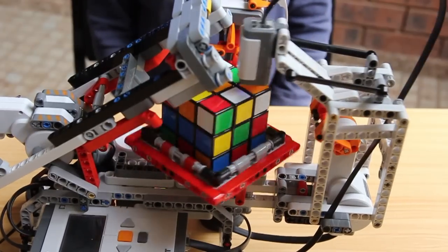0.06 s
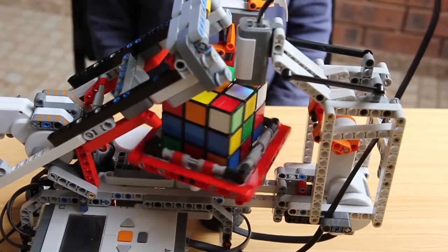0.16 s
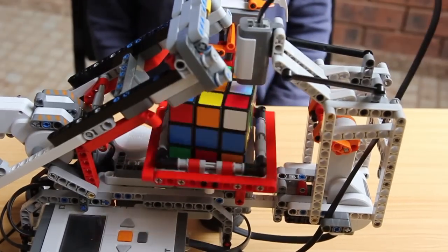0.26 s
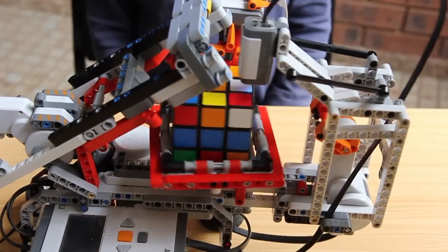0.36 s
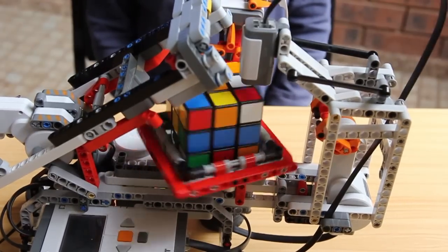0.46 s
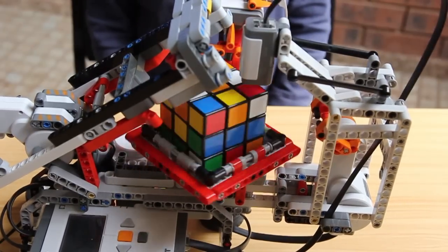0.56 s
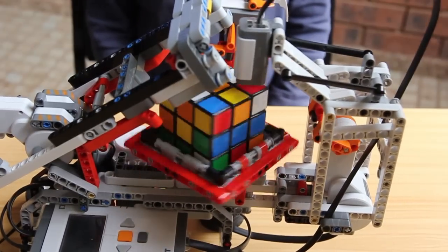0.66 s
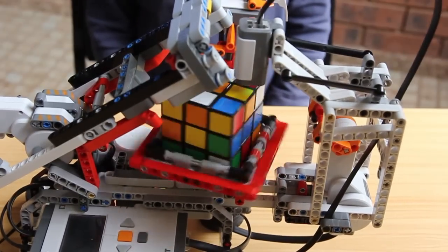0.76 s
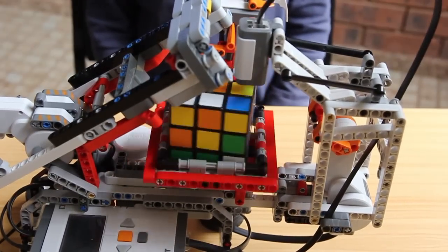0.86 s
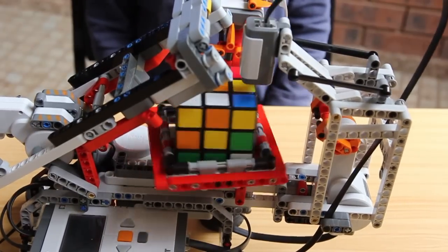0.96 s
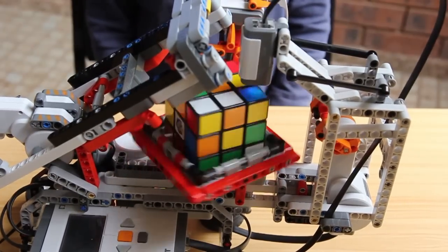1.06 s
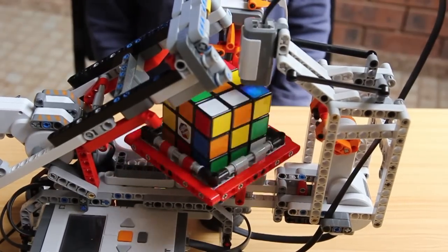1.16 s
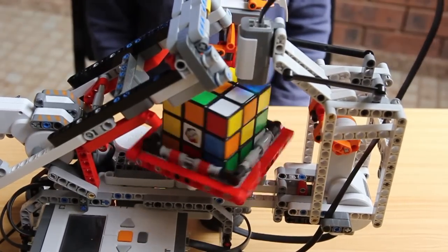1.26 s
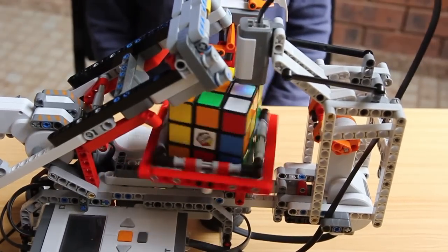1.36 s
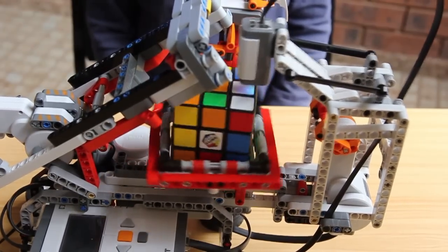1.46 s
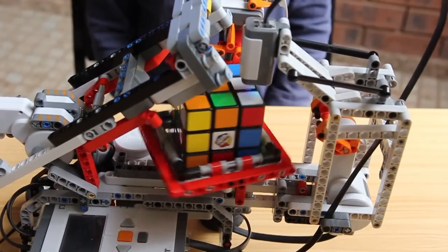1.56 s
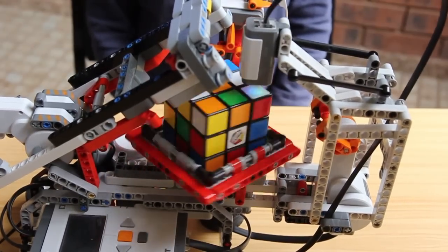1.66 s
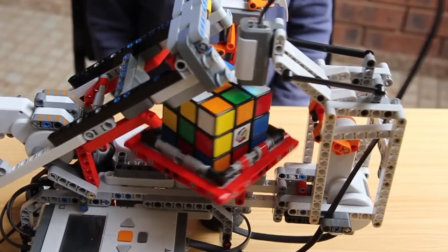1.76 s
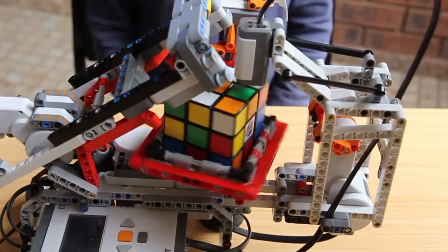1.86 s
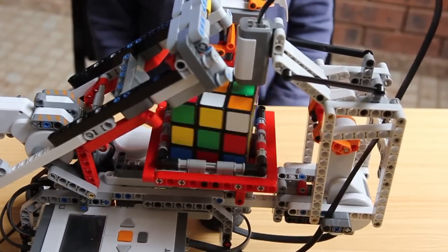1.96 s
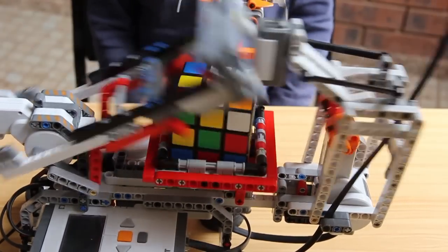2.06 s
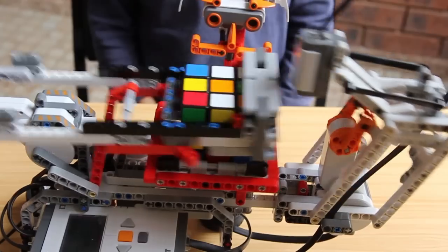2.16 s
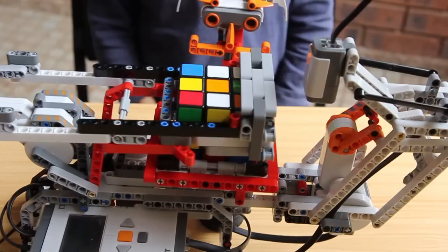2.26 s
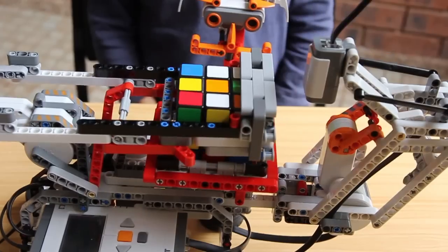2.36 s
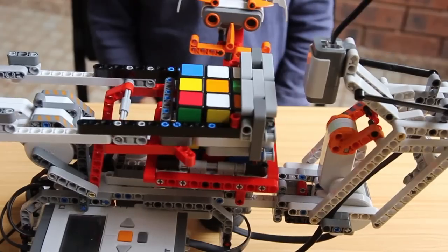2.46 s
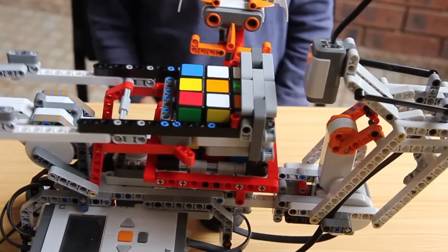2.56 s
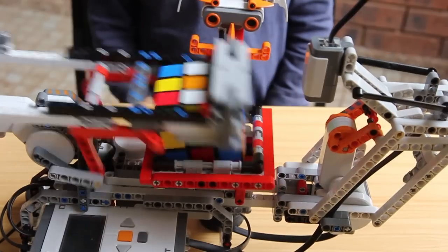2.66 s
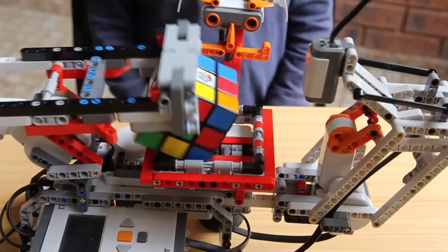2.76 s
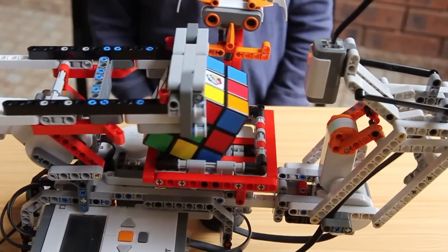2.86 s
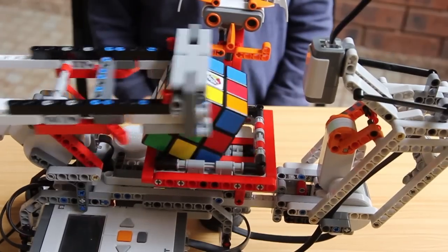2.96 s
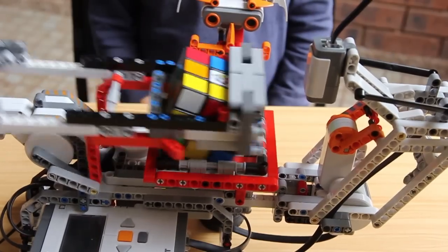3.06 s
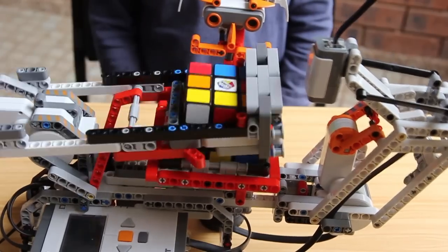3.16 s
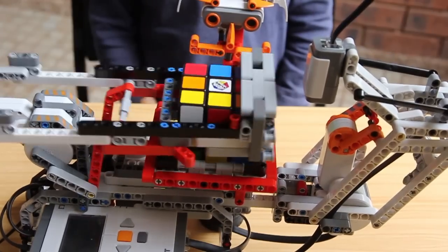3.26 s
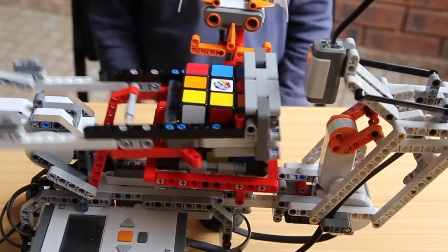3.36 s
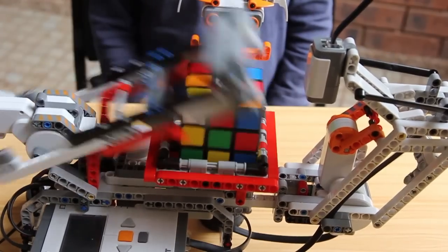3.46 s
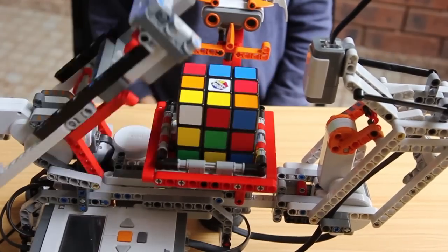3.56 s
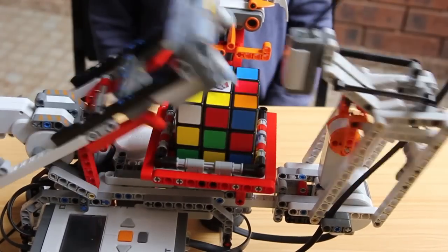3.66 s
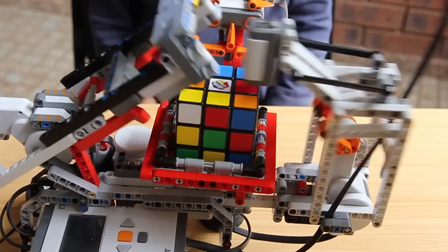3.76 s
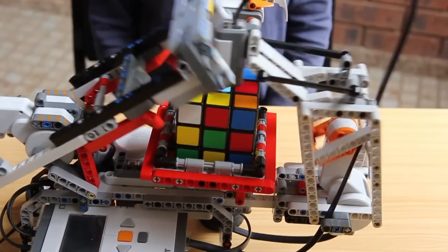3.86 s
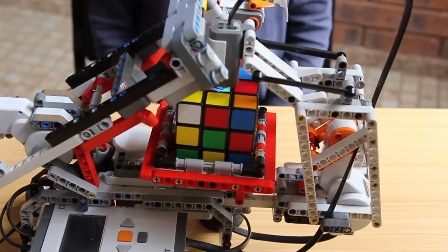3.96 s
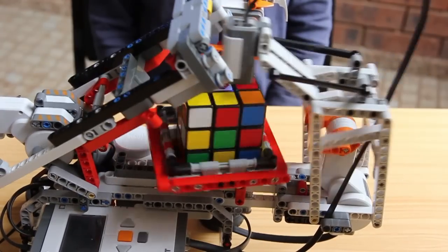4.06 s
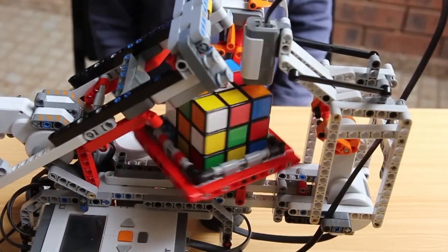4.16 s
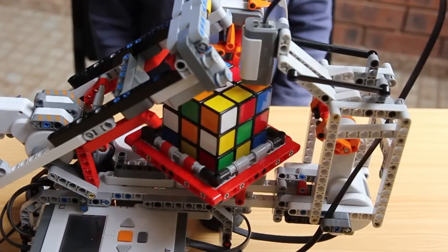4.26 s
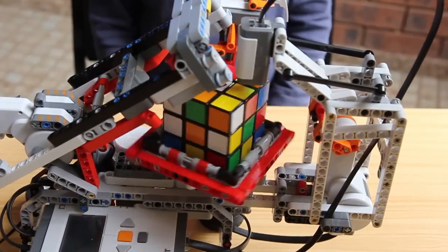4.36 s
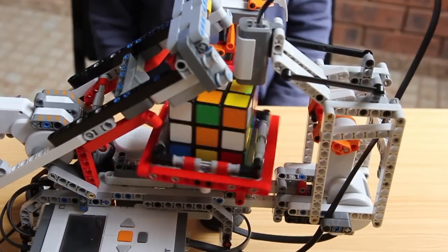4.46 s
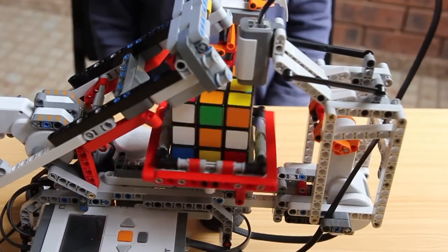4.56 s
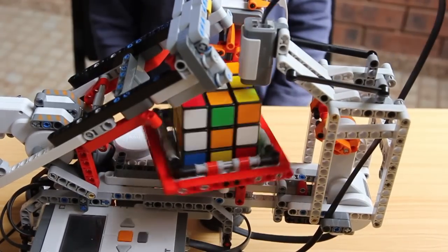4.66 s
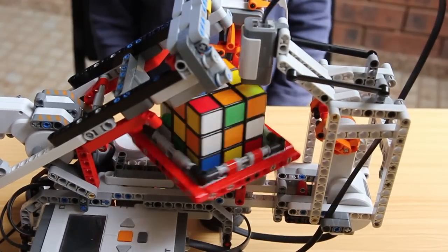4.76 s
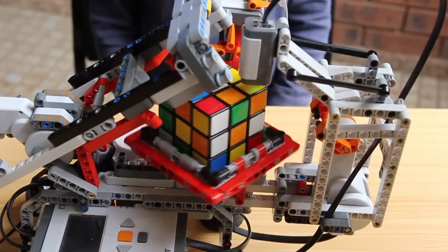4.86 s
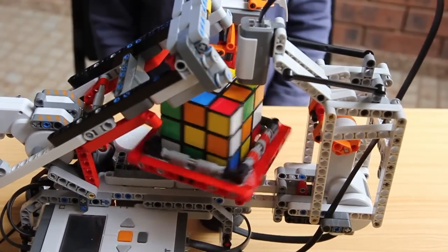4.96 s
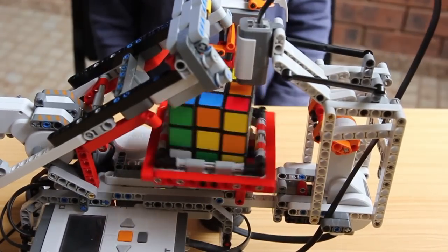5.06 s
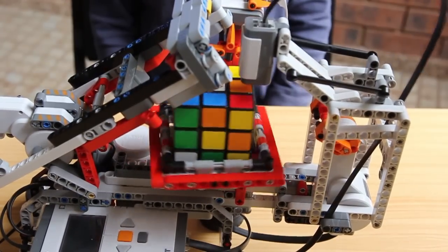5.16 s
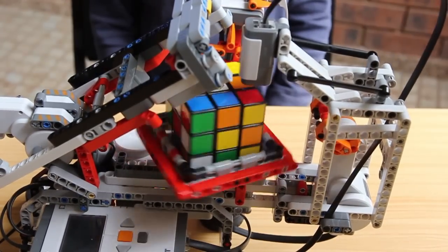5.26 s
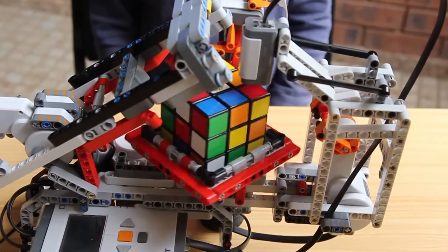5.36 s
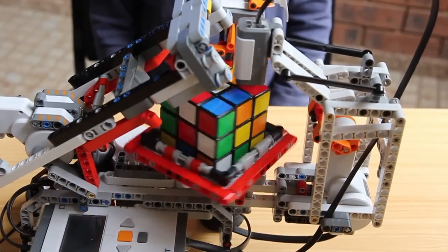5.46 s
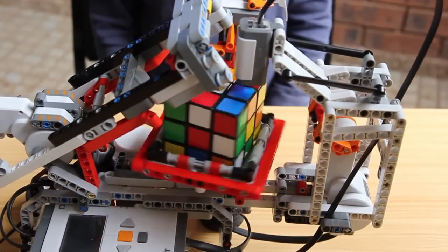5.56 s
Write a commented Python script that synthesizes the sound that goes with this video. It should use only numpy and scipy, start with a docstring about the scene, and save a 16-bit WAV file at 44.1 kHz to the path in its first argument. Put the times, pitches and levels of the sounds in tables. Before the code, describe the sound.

Small geared motors whir in rapid rhythmic steps, then plastic clacks and a short jerky whine as a toy robot tips a puzzle cube, before the stepping resumes.

```python
"""Toy robot scanning a puzzle cube

A plastic toy robot, heard close up on a table indoors. Three geared servos, made of tooth knocks and
tooth-rate harmonics, step the turntable, swing the sensor arm and tilt the cube. Noise bursts clack,
frame modes drum, trembling sines howl, squeak and hum, low noise rumbles; a quiet room answers."""
import sys
import numpy as np
from scipy import signal
from scipy.fft import rfft, irfft
from scipy.io import wavfile
from scipy.ndimage import uniform_filter1d

SR = 44100
rng = np.random.default_rng(int(sys.argv[2]) if len(sys.argv) > 2 else 0)


def generate_wav(sig):
    """Save sig (samples, or channels by samples) to the path in sys.argv[1] as 16-bit PCM at SR."""
    pcm = np.round(np.clip(np.atleast_2d(sig).T, -1, 1) * 32767).astype(np.int16)
    wavfile.write(sys.argv[1], SR, pcm)


N = 247820
T = np.arange(N) / SR
FREQS = np.maximum(np.fft.rfftfreq(N, 1 / SR), 1)


def undb(db):
    """Decibels to gain."""
    return 10 ** (np.asarray(db) / 20)


def unit(x):
    """Scale to rms 1."""
    return x / np.sqrt(np.mean(x ** 2) + 1e-18)


def swell(at_s, half_s):
    """Gaussian bump in time."""
    return np.exp(-.5 * ((T - at_s) / half_s) ** 2)


def walk(rate_hz):
    """Smooth chance of rms 1, with rate_hz new values per second."""
    return unit(np.interp(T * rate_hz, np.arange(N // 8), rng.standard_normal(N // 8)))


def envelope(start_s, attack_s, held_s, fade_db_per_s):
    """Linear attack, hold until held_s after the start, then exponential fade."""
    attack = np.clip((T - start_s) / attack_s, 0, 1)
    return attack * undb(-fade_db_per_s * np.maximum(T - start_s - held_s, 0))


def tone(hz, flutter):
    """Sine whose pitch trembles."""
    phase = 2 * np.pi * np.cumsum(hz * (1 + flutter * walk(300))) / SR
    return np.sqrt(2) * np.sin(phase)


def colour(x, body, rings=()):
    """Minimum-phase filter from a broad spectrum and resonances; keeps the power of white noise."""
    hz, db = np.transpose(body)
    db = np.interp(np.log(FREQS), np.log(hz), db)
    for centre_hz, width_hz, lift_db in rings:
        db = db + lift_db / (1 + (2 * (FREQS - centre_hz) / width_hz) ** 2)
    # folding the cepstrum makes the filter causal
    cepstrum = irfft(np.log(unit(undb(db))), N)
    cepstrum[1:N // 2] *= 2
    cepstrum[N // 2 + 1:] = 0
    return irfft(rfft(x) * np.exp(rfft(cepstrum)), N)


def rattle(tooth_hz, scatter_db, ring_s, miss, wobble_db):
    """Teeth knock in their backlash: each lands off time, with its own force, and rings briefly."""
    teeth = np.flatnonzero(np.diff(np.floor(np.cumsum(tooth_hz) / SR)))
    chance = rng.standard_normal((N // 20, 2))[:len(teeth)]
    late = miss * chance[:, 0] * SR / tooth_hz[teeth]  # miss: spread in tooth periods
    at = np.clip(teeth + late, 0, N - 1).astype(int)
    force = undb(scatter_db * np.minimum(chance[:, 1], 2.5))
    power = np.bincount(at, force ** 2, N)
    ringing = np.sqrt(signal.lfilter([1], [1, -np.exp(-2 / (ring_s * SR))], power))
    return unit(ringing * rng.standard_normal(N) * undb(wobble_db * walk(130)))


def whine(tooth_hz, orders, flutter, flicker_db):
    """Harmonics of the tooth rate; uneven teeth shake their pitch and strength."""
    phase = 2 * np.pi * np.cumsum(tooth_hz * (1 + flutter * walk(350))) / SR
    multiple, db = np.transpose(orders)
    out = 0
    for k in np.arange(1, 19):
        level = undb(np.interp(k, multiple, db) + flicker_db * walk(90))
        out = out + level * np.sin(k * phase + rng.uniform(0, 2 * np.pi))
    return unit(out)


SOFT_HZ = 7740  # gentle tooth contact loses treble above this


def soften(x, gain, power):
    """Applies a motor's gain; below half the top gain the treble falls further, by this power."""
    body = irfft(rfft(x) / (1 + (FREQS / SOFT_HZ) ** 6), N)
    return gain * (body + np.minimum(2 * gain / gain.max(), 1) ** power * (x - body))


def wander(x, spread_db, rate_hz):
    """Half-octave bands from 1 kHz up swell and fade apart, as a turning source changes sides."""
    place = np.clip(2 * np.log2(FREQS / 1000), 0, 8)
    spectrum = rfft(x)
    out = 0
    for band in range(9):
        part = irfft(spectrum * np.maximum(1 - abs(place - band), 0), N)
        out = out + part * undb(spread_db * walk(rate_hz))
    return unit(out)


# still room: (frequency [Hz], relative level [dB])
ROOM_TONE_SPECTRUM = [(25, -18), (45, -8), (80, 0), (180, 0.5), (400, 0), (1000, -2.5), (2000, -15.5),
                      (4000, -19.5), (8000, -28.5), (10000, -28), (15000, -53)]


def room_tone():
    """Steady noise, mostly low."""
    return undb(-45.5) * unit(colour(rng.standard_normal(N), ROOM_TONE_SPECTRUM))


# eighth-turn steps: (start [s], length [s], kick [relative dB], cruise [relative dB],
# braking [relative dB], sensor arm twitch [relative dB])
TURN_STEPS = [(-0.21, 0.28, -27, -29, -26.5, -29), (0.063, 0.28, -24.5, -27.5, -23.5, -26.5),
              (0.342, 0.28, -26.5, -26, -25, -28.5), (0.638, 0.3, -26, -28, -24, -27),
              (0.928, 0.28, -26, -26, -25, -24.5), (1.202, 0.28, -24.5, -26.5, -25.5, -28.5),
              (1.486, 0.29, -24.5, -27, -27, -25.5), (1.767, 0.29, -24, -26.5, -25.5, -30.5),
              (4.309, .28, -27, -28, -23.5, -25), (4.587, 0.32, -26.5, -26, -26.5, -30.5),
              (4.898, .27, -24.5, -26.5, -23.5, -27), (5.161, 0.29, -25.5, -26, -27.5, -27),
              (5.447, 0.3, -25, -26.5, -26, -29)]
KICK_S, EASE_S, CRUISE_S = .054, .092, .125  # after step start
BRAKE_RISE_S, STOP_S = .03, .07  # braking builds up, then stops the table
EASE_DB, CREEP_DB = -2.5, -38.5  # relative to cruise; level at both ends of a step


def stepping():
    """Turntable gain: each step kicks off, eases back, cruises, then brakes to a creep."""
    gain = np.zeros(N)
    for start, length, kick, cruise, brake, _ in TURN_STEPS:
        brake_at = length - STOP_S
        ages = np.sort([0, KICK_S, EASE_S, CRUISE_S, brake_at - BRAKE_RISE_S, brake_at, length])
        levels = [CREEP_DB, kick, cruise + EASE_DB, cruise, cruise, brake, CREEP_DB]
        db = np.interp(T - start, ages, levels)
        outside_s = np.maximum(np.abs(T - start - length / 2) - length / 2, 0)
        gain = np.maximum(gain, undb(db) * np.exp(-(outside_s / 0.011) ** 2))
    return gain


# turntable and arm gear whine: (multiple of tooth rate, relative level [dB])
LIGHT_WHINE = [(1, 4), (2, 1.5), (3, 1.5), (4, 0), (5, -4), (6, -3), (7, -1), (9, -6), (12, -8), (18, -10)]
# turntable housing: (frequency [Hz], relative level [dB])
TURN_BODY = [(40, -44), (200, -25.5), (500, -13), (800, -14), (1150, -10.5), (1550, -4), (2100, -1),
             (2900, -4.5), (3800, -2), (5100, -6), (6100, -3), (7000, -7), (9600, -8.5), (11300, -10.5),
             (15500, -26)]
# turntable housing resonances: (frequency [Hz], width [Hz], lift [dB])
TURN_RINGS = [(484, 26, 11), (611, 28, 10), (1460, 120, 1.5), (1700, 130, 4.5), (3750, 1300, 5.3),
              (4980, 310, 3), (6000, 600, 5), (7640, 580, 6), (9500, 320, 5.5)]


def turntable(drive):
    """Loaded turntable: mostly loose rattle, quicker teeth when louder, under an uneven load."""
    # inertia rounds off every start and stop
    gain = np.sqrt(np.abs(uniform_filter1d(drive ** 2, size=800)))
    tooth_hz = 350 + 450 * np.sqrt(gain / gain.max())
    gears = rattle(tooth_hz, scatter_db=2.0, ring_s=0.002, miss=0.28, wobble_db=1.0)
    gears = gears + undb(-13.5) * whine(tooth_hz, LIGHT_WHINE, flutter=0.027, flicker_db=5.0)
    gears = wander(gears, spread_db=1, rate_hz=25)
    gears = unit(gears * undb(.7 * walk(40)))
    return undb(-0.01) * colour(soften(gears, gain, power=0.35), TURN_BODY, TURN_RINGS)


# arm housing in a twitch: (frequency [Hz], relative level [dB])
NUDGE_BODY = [(500, -20), (2000, -12), (7500, -14), (8800, -2), (9500, 2.5), (10200, -14), (15500, -26)]
TWITCH_DELAY_S, TWITCH_HALF_S = 0.039, .015  # after step start; Gaussian half length


def nudges():
    """Arm twitches early in each step: too brief to gather speed, they only set off its sizzle."""
    gain = sum(undb(db) * swell(start + TWITCH_DELAY_S, TWITCH_HALF_S) for start, *_, db in TURN_STEPS)
    sizzle = rattle(np.full(N, 400.), scatter_db=6.0, ring_s=0.0052, miss=0.9, wobble_db=2.5)
    return colour(gain * sizzle, NUDGE_BODY)


# beam modes: (frequency [Hz], width [Hz], relative level [dB])
FRAME_MODES = [(100, 22, -11), (151.5, 18, -2), (232, 22, 1.5), (281, 59, 4), (394, 23, 3), (490, 64, 0)]
# a heavy part stops or swings: (time [s], level [relative dB], half length [s])
SHUDDERS = [(2.26, -39.5, 0.061), (2.907, -39.5, .04), (3.217, -40, 0.14), (3.71, -36, 0.053),
            (5.048, -43, 0.028)]
TURN_SHAKE_DB, SERVO_SHAKE_DB = -25, -33.5  # relative to the gears that shake the frame


def frame(turn_gain, servo_gain):
    """Slow gears and heavy moving parts shake the beams, which drum at their low modes."""
    modes = sum(undb(db) ** 2 / (1 + (2 * (FREQS - hz) / width) ** 2) ** 2 for hz, width, db in FRAME_MODES)
    knocks = rattle(np.full(N, 90.), scatter_db=0.5, ring_s=0.021, miss=0.33, wobble_db=1.5)
    drumming = unit(irfft(rfft(knocks) * np.sqrt(modes), N))
    shaking = undb(TURN_SHAKE_DB) * turn_gain + undb(SERVO_SHAKE_DB) * servo_gain
    shudder = sum(undb(db) * swell(at, half) for at, db, half in SHUDDERS)
    return drumming * np.hypot(shaking, shudder)


# cube and beams: (time [s], level [relative dB], treble over middle [dB])
CLACKS = [(0.067, -19, 2), (0.641, -20, 1), (2.153, 3, -9), (2.177, -3.5, 4), (2.195, -15, -3),
          (2.215, -2.5, -2), (2.387, -26, 8.5), (2.703, -4.5, -10), (2.802, -27, 1), (2.831, -14, -1),
          (2.849, -8.5, -6), (2.89, -3, -3), (2.977, -15, -15), (3.092, -5.5, 5.5), (3.117, -1, -5),
          (3.125, -4, -6), (3.194, -4, 4), (3.207, -5, -4.5), (3.294, -13, 8.5), (3.438, -16.5, 2),
          (3.543, -9.5, 10.5), (3.629, -17.5, 1), (4.125, -8, 3)]
# plastic parts: (frequency [Hz], relative level [dB])
CLACK_BODY = [(40, -40), (200, -36), (700, -9), (1200, 3.5), (2200, 0), (3600, 2), (6000, 2.5), (9500, -1),
              (12000, -0.5), (15500, -15)]
CRACK_S, CLACK_T60_S = 0.00079, 0.051  # crack time constant; ring decay to -60 dB


def clacks():
    """Plastic on plastic: a crack and a short dense ring, brighter for harder contact."""
    out, age = np.zeros(N + SR), T[:SR // 5]
    fade = np.exp(-age / CRACK_S) + .5 * undb(-60 * age / CLACK_T60_S)
    for at, db, treble_db in CLACKS:
        burst = rng.standard_normal(len(age)) * fade
        middle = signal.lfilter(*signal.butter(1, 3000, fs=SR), burst)
        start = int(at * SR)
        out[start:start + len(age)] += undb(db) * (middle + undb(treble_db) * (burst - middle))
    return undb(-8.5) * colour(out[:N], CLACK_BODY)


SLACK_S, COAST_S = .025, .35  # tooth rate leads the drive by the play; run-down time constant
UNLOAD_S = 0.015  # whine decay constant once drive is cut


def servo(moves, bite):
    """Gain, tooth rate, whine share: nears final speed, meshes while driven, coasts; bite is a power."""
    gain, tooth_hz, clean = np.zeros(N), np.full(N, moves[0][6], float), np.zeros(N)
    for start, attack, driven, fade_db, db, whine_db, first_hz, final_hz, spin_up in moves:
        drive = envelope(start, attack, driven, fade_db)
        age = np.maximum(T - start, 0)
        coasting = np.maximum(age - driven, 0)
        speed = final_hz + (first_hz - final_hz) * np.exp(-age / spin_up)
        speed = speed * np.maximum(np.exp(-coasting / COAST_S), .5)
        tooth_hz = np.where(T > start - SLACK_S, speed, tooth_hz)
        gain = np.maximum(gain, undb(db) * drive)
        clean = np.maximum(clean, undb(whine_db) * drive ** bite * np.exp(-coasting / UNLOAD_S))
    return gain, tooth_hz, clean


# swings: (start [s], attack [s], drive end after start [s], fade [dB/s], level [relative dB],
# whine over rattle [dB], first tooth rate [Hz], final tooth rate [Hz], spin-up time constant [s])
ARM_SWINGS = [(2.05, 0.047, 0.2, 191, -18.5, -7, 470, 899, 0.12),
              (3.615, 0.091, 0.34, 378, -17.4, -5.5, 471.5, 895.6, 0.16),
              (4.026, 0.049, 0.16, 127.5, -16.8, -6, 490.3, 881, .095)]
# arm housing: (frequency [Hz], relative level [dB])
ARM_BODY = [(40, -24), (300, -27.5), (550, -15.5), (820, -18), (1050, -14.5), (2070, -3.5), (2800, -4),
            (4700, 0), (8200, -6), (9400, 2), (10400, -5.5), (13000, -11.5), (15500, -19)]
# arm housing resonances and dips: (frequency [Hz], width [Hz], lift [dB])
ARM_RINGS = [(830, 100, 6.5), (4950, 1200, -3), (7500, 1240, 0.5), (8900, 1500, -0.5), (9100, 2000, 4.5),
             (10500, 650, -6)]


def sensor_arm(gain, tooth_hz, clean):
    """Lightly loaded arm servo runs up fast, with a bright sizzle in its housing."""
    loose = rattle(tooth_hz, scatter_db=4.0, ring_s=0.0033, miss=0.18, wobble_db=0.27)
    meshed = whine(tooth_hz, LIGHT_WHINE, flutter=.012, flicker_db=4)
    gears = (loose + clean * meshed) / np.hypot(1, clean)
    return undb(-1.17) * colour(soften(gears, gain, power=1), ARM_BODY, ARM_RINGS)


# down, four jerks that tip the cube, pull back, up: columns as ARM_SWINGS
FORK_STROKES = [(2.63, 0.095, .138, 186, -15.5, 6.5, 449.6, 735.2, .045),
                (2.998, 0.04, 0.065, 450, -22, -1.5, 1010, 780, .14),
                (3.085, 0.02, 0.033, 350, -21, -6, 909, 847, 0.0692),
                (3.143, 0.015, .028, 550, -20, -3, 856, 865, 0.036),
                (3.186, 0.016, .016, 276, -20.5, -20, 836.4, 682, .05),
                (3.272, 0.023, .064, 418, -24, -14, 675, 559.7, .08),
                (3.41, 0.079, 0.13, 279, -16.5, 2, 569, 844, .06)]
# fork gear whine: (multiple of tooth rate, relative level [dB])
FORK_WHINE = [(1, -7), (2, 5.5), (3, -2.5), (4, 1.5), (5, 1), (6, 4.5), (7, -1.5), (8, -1.5), (10, -2),
              (14, 3.5), (18, 5)]
# fork housing: (frequency [Hz], relative level [dB])
FORK_BODY = [(40, -48), (300, -22), (700, -12.5), (1000, -20), (1400, -4), (2000, -1), (3000, -2),
             (4800, -2), (6000, -2.5), (7700, -3.5), (10100, -6.5), (15500, -15.5)]
# fork housing resonances: (frequency [Hz], width [Hz], lift [dB])
FORK_RINGS = [(1660, 160, 0.44), (3170, 160, 2.3), (4760, 260, 7.9), (5880, 290, 5.1), (6440, 530, 6.1),
              (8100, 640, 3.8), (9840, 550, 5.8)]


def fork(gain, tooth_hz, clean):
    """Tilting servo: load presses the teeth together, so rattle turns into whine."""
    loose = rattle(tooth_hz, scatter_db=3.0, ring_s=0.0021, miss=0.21, wobble_db=0.0)
    meshed = whine(tooth_hz, FORK_WHINE, flutter=0.00837, flicker_db=6.5)
    gears = (loose + clean * meshed) / np.hypot(1, clean)
    return undb(-0.85) * colour(soften(gears, gain, power=0.11), FORK_BODY, FORK_RINGS)


# fork under load: (start [s], attack [s], hold end after start [s], fade [dB/s], level [relative dB])
HOWL = (2.98, .055, .09, 80, -30)


def howl(tooth_hz):
    """Under the cube's weight the fork sings roughly at its tooth rate and the octave."""
    start, attack, held, fade_db, db = HOWL
    octave = tone(2 * tooth_hz, flutter=.04) * undb(2.3 * walk(220))
    voice = octave + undb(-15.5) * tone(tooth_hz, flutter=0.0218)
    return undb(db) * envelope(start, attack, held, fade_db) * voice


# one soft swell: (time [s], frequency [Hz], level [relative dB], half length [s])
RUMBLE = (4.28, 85, -47, .065)


def rumble():
    """Short swell of deep band-passed noise."""
    at, hz, db, half = RUMBLE
    band = signal.butter(2, [hz / 1.25, hz * 1.25], "bandpass", fs=SR, output="sos")
    return undb(db) * swell(at, half) * unit(signal.sosfilt(band, rng.standard_normal(N)))


# plastic squeaks, then beam hums: (time [s], frequency [Hz], level [relative dB], half length [s])
SQUEAKS_AND_HUMS = [(4.653, 3960, -35, .012), (4.692, 3035, -29.5, .02), (4.742, 3850, -37, .01),
                    (5.05, 497, -42, .025), (5.11, 608, -46, .05)]


def squeaks_and_hums():
    """Brief trembling tones: plastic squeaks near 3 to 4 kHz, then beams humming near 500 and 600 Hz."""
    return sum(undb(db) * swell(at, half) * tone(hz, flutter=.01) for at, hz, db, half in SQUEAKS_AND_HUMS)


def room(x, near_db, near_t60_s, far_db, far_t60_s, dull_hz):
    """Quick reflections from table and frame, then a duller tail from the walls."""
    near = unit(rng.standard_normal(N) * undb(-60 * T / near_t60_s) * (T > .001))
    far = rng.standard_normal(N) * undb(-60 * T / far_t60_s) * (T > .008)
    far = unit(signal.lfilter(*signal.butter(1, dull_hz, fs=SR), far))
    response = (undb(near_db) * near + undb(far_db) * far) / np.sqrt(N)
    return x + signal.fftconvolve(x, response[:SR])[:N]


def scene():
    """The robot in its room, over the room tone."""
    turn_gain = stepping()
    # whine share grows with drive to the power bite
    arm_gain, arm_hz, arm_clean = servo(ARM_SWINGS, bite=.6)
    fork_gain, fork_hz, fork_clean = servo(FORK_STROKES, bite=1.3)
    motors = turntable(turn_gain) + nudges()
    motors = motors + sensor_arm(arm_gain, arm_hz, arm_clean)
    motors = motors + fork(fork_gain, fork_hz, fork_clean) + howl(fork_hz)
    robot = motors + clacks() + frame(turn_gain, arm_gain + fork_gain)
    robot = robot + squeaks_and_hums() + rumble()
    heard = room(robot, near_db=-11, near_t60_s=.04, far_db=-13, far_t60_s=.35, dull_hz=3800)
    return (undb(-.5) * heard + room_tone())[None]


TOP_HZ = 15700


def record(dry):
    """Soft saturation rounds the tallest peaks; a steep low-pass cuts the top."""
    rounded = .9 * np.tanh(dry / .9)
    return signal.sosfilt(signal.ellip(10, .2, 80, TOP_HZ, fs=SR, output="sos"), rounded)


dry = scene()
out = record(dry)
generate_wav(out)
```